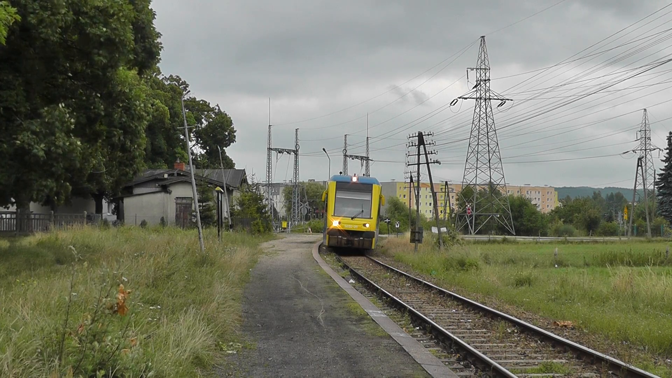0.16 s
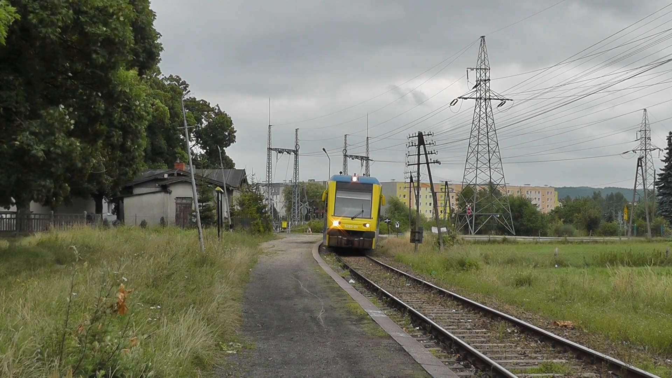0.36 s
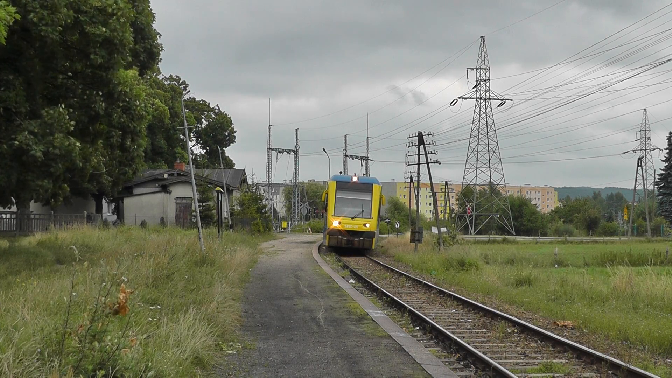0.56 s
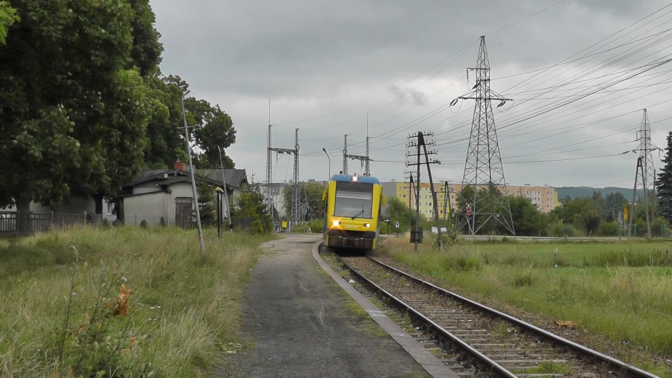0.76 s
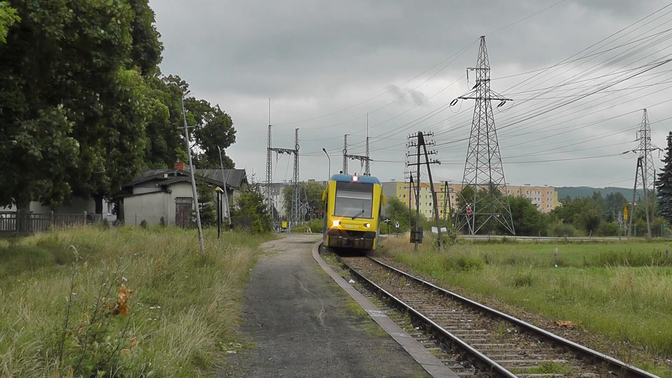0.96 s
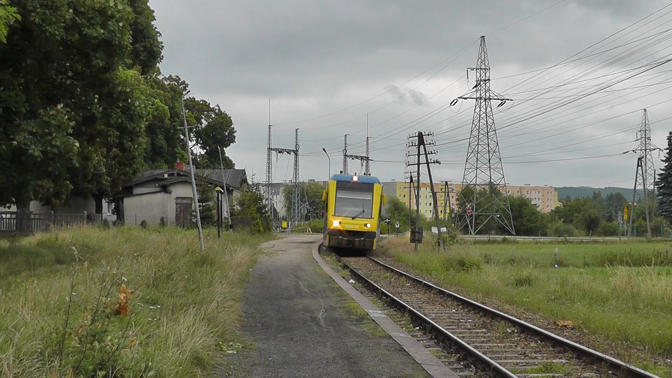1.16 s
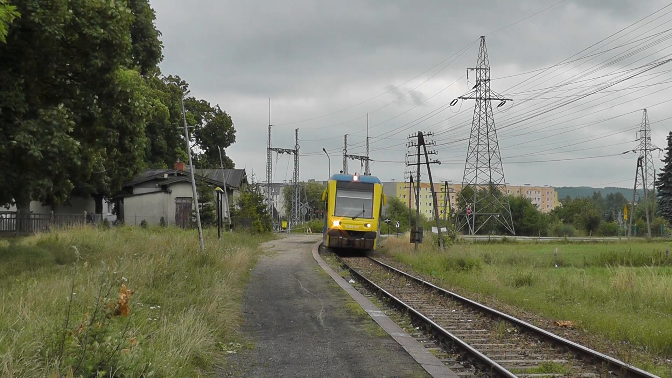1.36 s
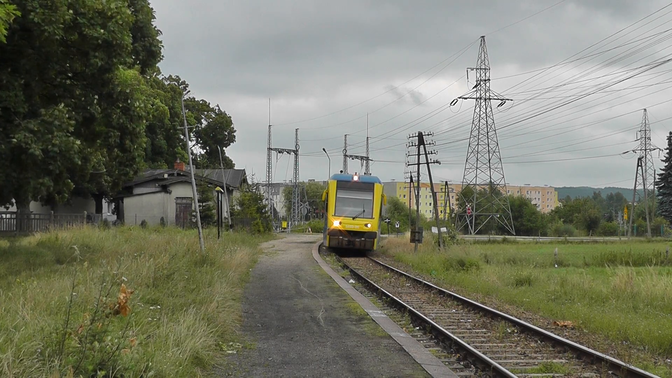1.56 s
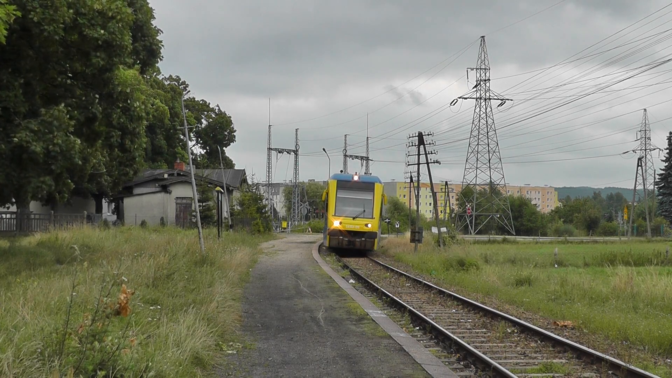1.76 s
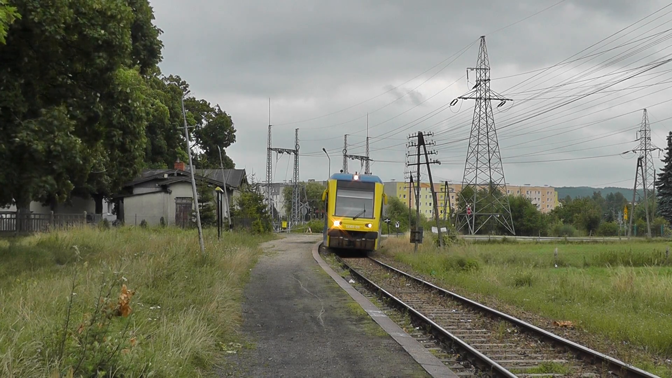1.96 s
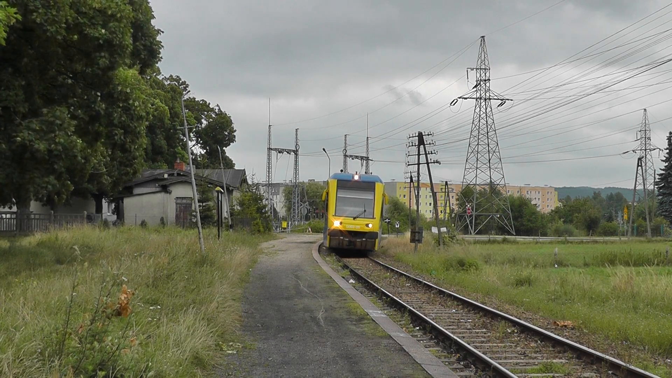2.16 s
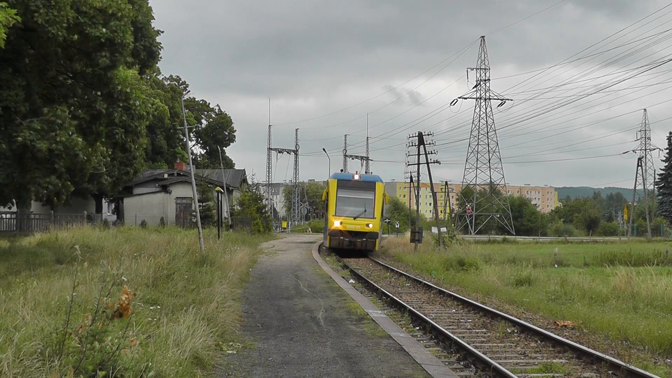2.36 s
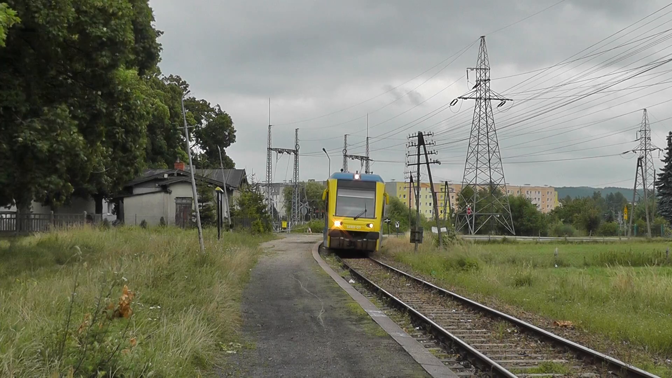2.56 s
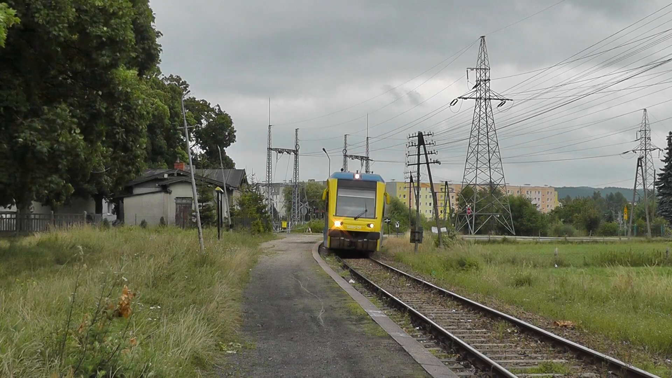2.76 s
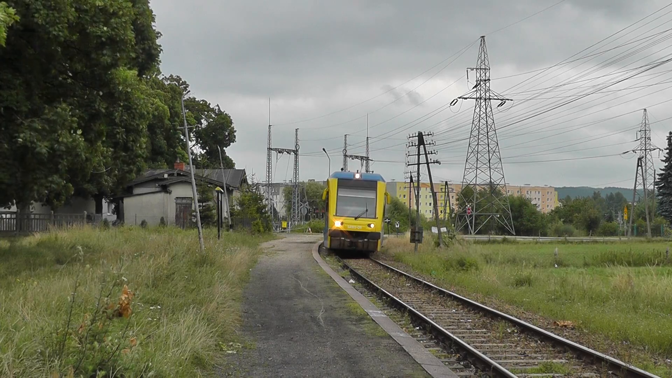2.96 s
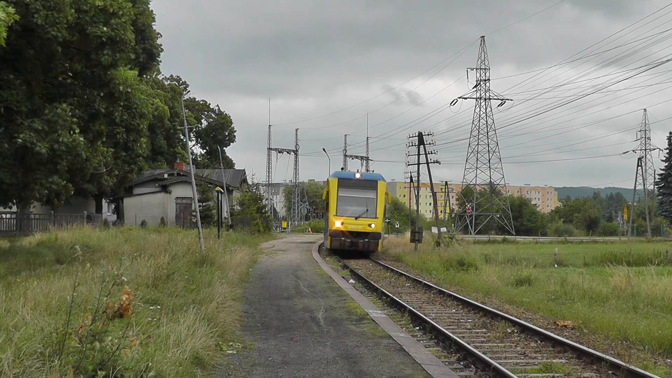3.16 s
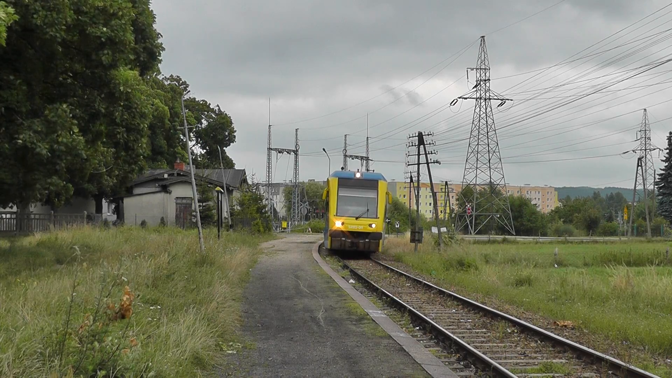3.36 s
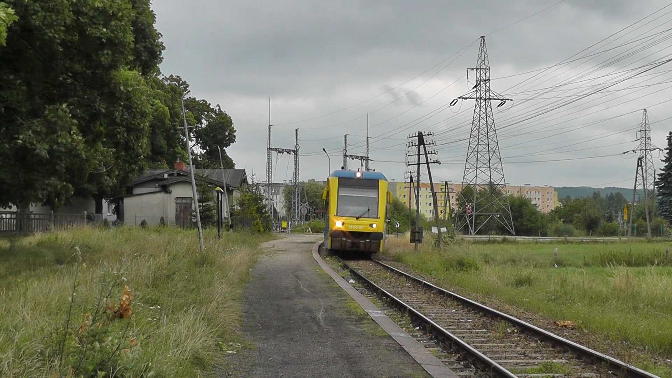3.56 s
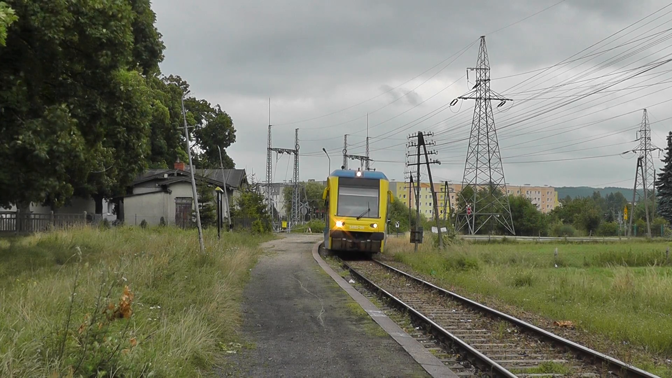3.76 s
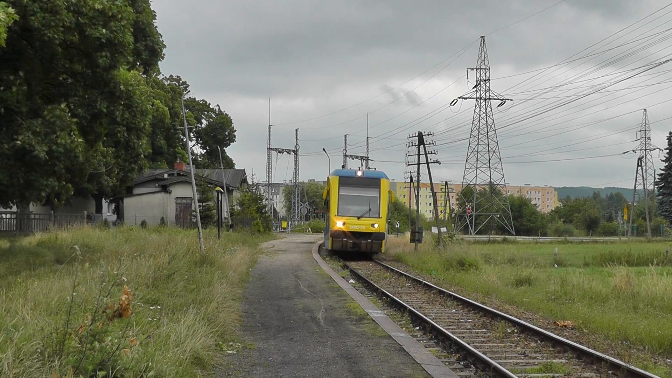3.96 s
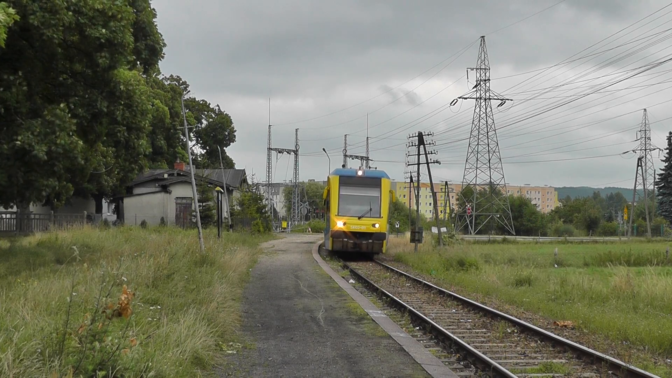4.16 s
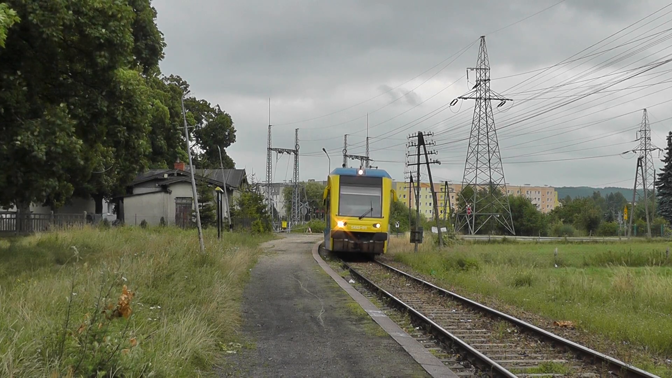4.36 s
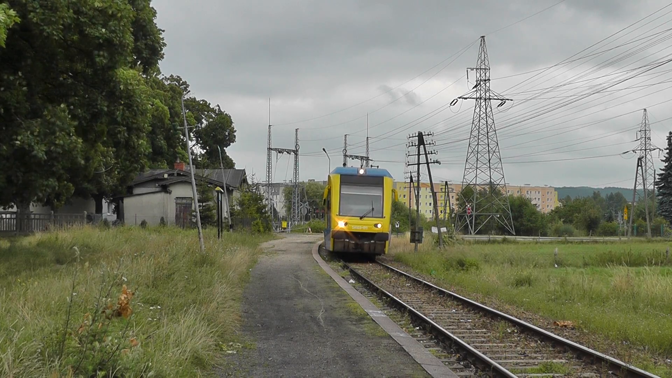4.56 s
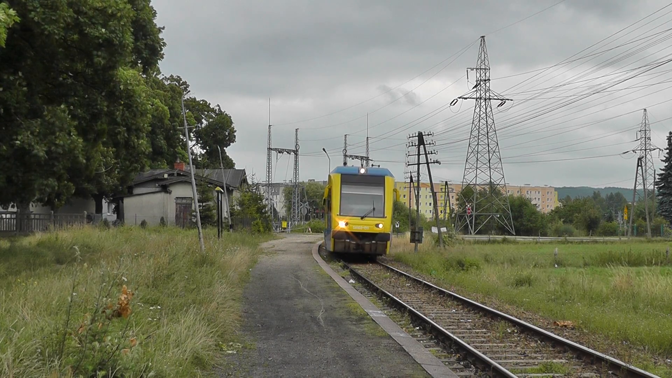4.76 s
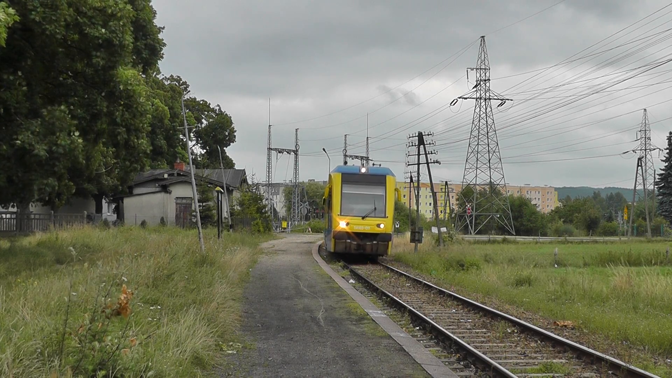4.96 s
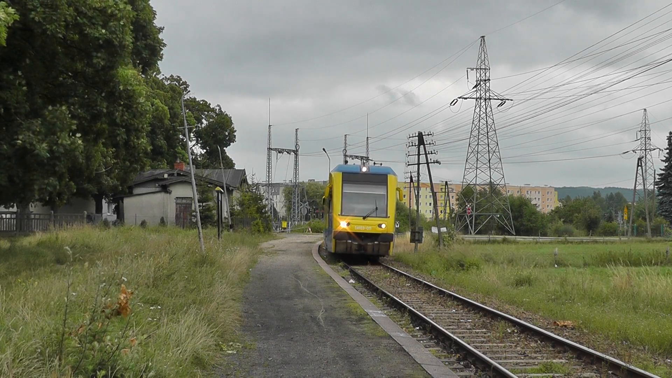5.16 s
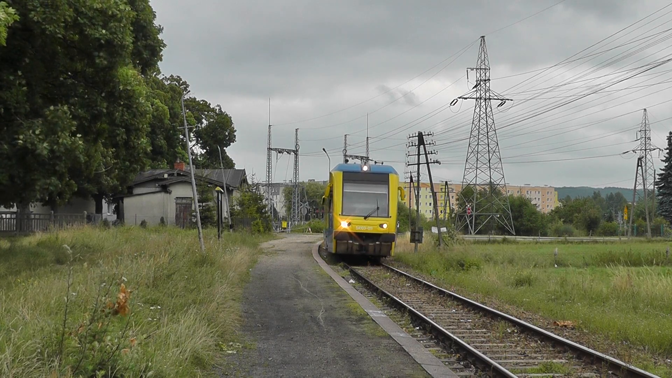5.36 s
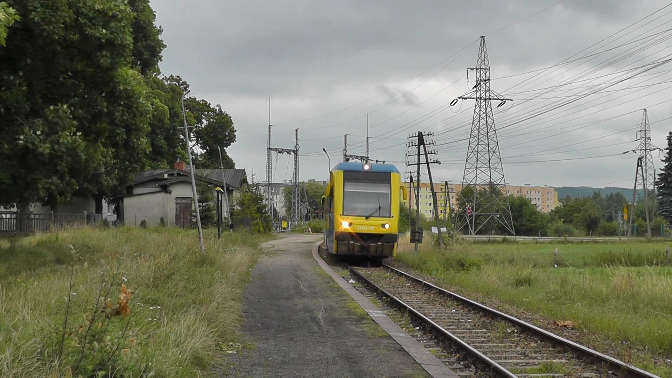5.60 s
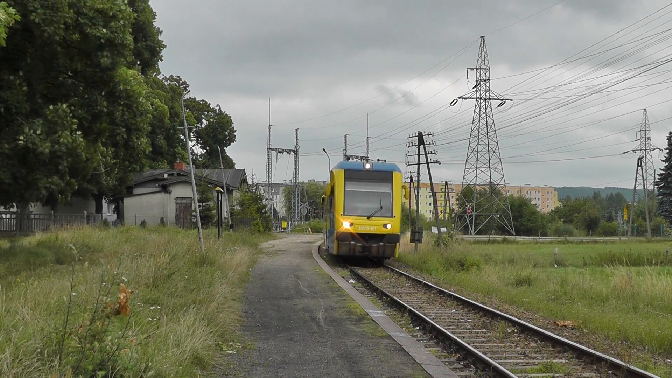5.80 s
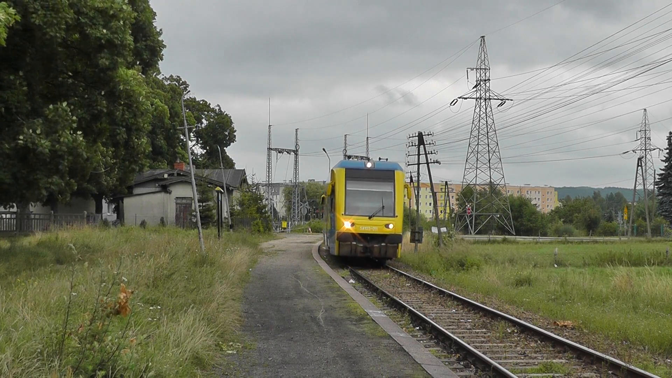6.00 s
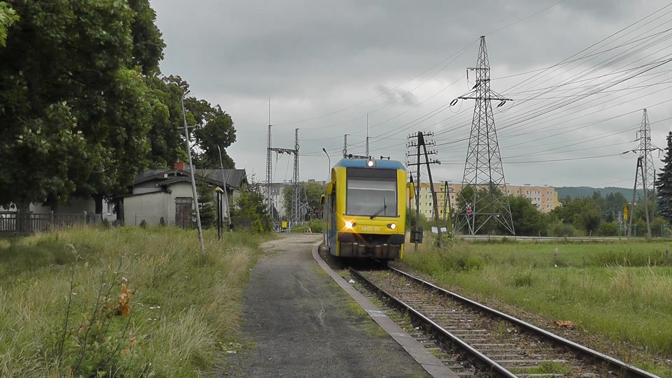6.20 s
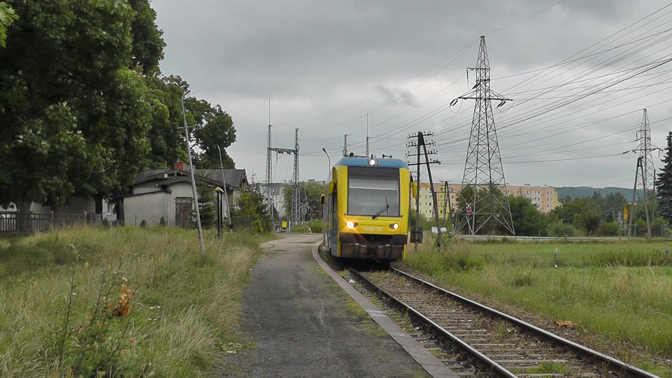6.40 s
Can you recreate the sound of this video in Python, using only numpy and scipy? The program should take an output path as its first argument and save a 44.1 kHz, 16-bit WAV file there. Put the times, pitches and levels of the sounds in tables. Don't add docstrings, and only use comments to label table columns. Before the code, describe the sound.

A stationary stereo microphone by the line hears a railcar pulling nearer under light breeze. First the engine is modest, with an echoing jackdaw call, hoarse sparrow chirps and faint magpie rasps. A short air-valve spit follows, then a thin turbo whistle rises near three seconds. The drone, mechanical clatter and cooling-air hiss swell continuously, loudest at the end, without the train passing.

```python
import sys
import numpy as np
from scipy import signal
from scipy.fft import rfft, irfft, next_fast_len
from scipy.io import wavfile
from scipy.ndimage import uniform_filter1d, map_coordinates

SR = 44100
rng = np.random.default_rng(int(sys.argv[2]) if len(sys.argv) > 2 else 0)


def volts_from_decibels(level):
    exponent = np.asarray(level, float) / 20
    return 10 ** exponent


def log_audio(samples):
    frames = np.atleast_2d(samples).T
    limited = np.clip(frames, -1, 1)
    pcm = np.round(limited * 32767).astype(np.int16)
    wavfile.write(sys.argv[1], SR, pcm)


N = 283563
TIME = np.arange(N) / SR

# time_s, engine_load_db, air_flow_db
LOAD = [(0, 0, 0), (.6, -1.5, -1.5), (1.4, .5, 0.5), (2, 2, 4), (2.65, 3, 7.5), (2.92, 4, 9),
        (3.35, 6.5, 8.5), (3.6, 7, 10), (3.85, 10.5, 11.5), (4.1, 11.5, 16.5), (4.35, 12, 18),
        (4.95, 14, 18), (5.25, 16, 19), (5.8, 16.5, 18.5), (6.43, 18.5, 21.5)]


def unit(x):
    return x / np.sqrt(np.mean(np.abs(x) ** 2) + 1e-20)


def along(points, hz, axis=1):
    table = np.transpose(points)
    return np.interp(np.log(hz + 1), np.log(table[0] + 1), table[axis])


def curves(rows):
    s, *columns = np.transpose(rows)
    return [np.interp(TIME, s, column) for column in columns]


def wobble(rate):
    return map_coordinates(rng.standard_normal(int(N * rate / SR) + 4), [TIME * rate])


def swell(s, hold, rise, fall, db):
    early = (s - TIME) * rise
    late = (TIME - s - hold) * fall
    return db - np.maximum(0, np.maximum(early, late))


def law(control_db, rest_db, slope):
    return rest_db + slope * control_db


def filtered(x, response):
    m = next_fast_len(N + 8192)
    return irfft(rfft(x, m) * response(np.fft.rfftfreq(m, 1 / SR)), m)[..., :N]


def shade(points):
    return lambda hz: volts_from_decibels(along(points, hz))


def modes(table):
    def response(f):
        total = 0
        for k, (c, w, db) in enumerate(table):
            total = total + (-1) ** k * volts_from_decibels(db) * 1j * f * w / (c * c - f * f + 1j * f * w)
        return total
    return response


def turns(hz):
    return 2 * np.pi * np.cumsum(hz) / SR


def rush(colour, patchy_db):
    z = signal.stft(rng.standard_normal((2, N)), nperseg=512)[2]
    patches = uniform_filter1d(rng.standard_normal(z.shape[1:]), size=7, axis=0)
    patches = uniform_filter1d(patches, size=14, axis=1)
    pair = signal.istft(z * volts_from_decibels(patchy_db * unit(patches)), nperseg=512)[1][:, :N]
    return unit(filtered(pair, colour))


def whistle(hz, width_hz):
    fuzz = lambda: wobble(width_hz) + 1j * wobble(width_hz)
    return unit(np.real(np.array([fuzz(), fuzz()]) * np.exp(1j * turns(hz))))


def scattered(x, wet_db, t60):
    t = TIME[:SR // 2]
    tail = rng.standard_normal((2, len(t))) * volts_from_decibels(-60 * t / t60)
    return volts_from_decibels(wet_db) * signal.fftconvolve(x[None], tail / np.linalg.norm(tail[0]), axes=1)[:, :N]


def engine():
    # time_s, rate_hz
    speed = [(0.0, 56.5), (0.4, 58.93), (1.2, 64.4), (1.6, 67.8), (3.2, 79.9), (3.6, 82.45), (4.0, 83.2),
             (4.4, 84.8), (4.8, 85.1), (5.6, 86.11), (6.3, 86.54)]
    # time_s, blower_multiple of the firing rate
    slip = [(2, 2.72), (4, 2.667)]
    # time_s, level_db
    note = [(0, -35), (.75, -34), (1.2, -38), (1.6, -32.5), (2.1, -37.5), (2.62, -35), (3.1, -34),
            (3.5, -37.5), (3.85, -35.5), (4.05, -30), (4.55, -30.5), (4.85, -22), (5.2, -20), (6, -18),
            (6.2, -16), (6.43, -16.5)]
    # time_s, depth_db
    fades = [(.25, 2), (.95, 13), (2.41, 10), (2.77, 4), (3.29, 8), (3.52, 10), (3.84, 6), (4.319, 3)]
    # firing_multiple, level_db re exhaust rumble
    weak_orders = [(1.167, -39), (1.333, -34), (1.5, -16), (1.667, -28), (1.835, -32), (2.167, -27),
                   (2.333, -25), (4.667, -26.5), (5, -26.5)]
    # centre_hz, width_hz, level_db
    pipe = [(114.4, 1.1, -43), (127, 4, -41.5), (138.2, 4.6, -33), (143.3, 2.7, -29.5), (150.6, 1.7, -32),
            (160.6, 8.4, -41.5), (167.7, 2.6, -42), (173.7, 3.6, -44)]
    # centre_hz, width_hz, level_db
    stack = [(169, 4.8, -42), (186, 8.8, -55), (216, 6, -47), (242, 9, -52)]
    # centre_hz, width_hz, level_db
    housing = [(171.3, 8, -40.5), (186, 7.5, -47.5), (229.5, 5, -49.5)]
    # centre_hz, width_hz, level_db
    silencer = [(404, 20, 0), (650, 25, -5), (850, 50, -4)]
    # freq_hz, density_db per Hz
    rumble_colour = [(54, -25), (92, -7), (113, -4.5), (161, -7), (189, -7), (252, -10.5), (281, -15),
                     (372, -16), (403, -13.5), (454, -14.5), (563, -28), (620, -29), (810, -44),
                     (1360, -120)]
    # freq_hz, density_db per Hz
    roar_colour = [(310, -6.5), (520, -2.5), (602, -9), (657, -0.5), (1040, -7), (1370, -3.5), (1680, -4.5),
                   (1790, -3), (1900, -2.5), (2470, -11), (4180, -120)]
    # freq_hz, density_db per Hz
    clatter_colour = [(1030, -31), (1750, 0.5), (1820, -1.5), (2000, -4.5), (2300, -3.5), (2700, -1.5),
                      (3080, -2), (3390, -3.5), (3930, -5), (4580, -11), (5900, -18.5), (7670, -18),
                      (13000, -120)]

    firing_hz = curves(speed)[0]
    crank = turns(firing_hz)
    load_db = curves(LOAD)[0]
    fade_s = 0.043
    first_db = curves(note)[0] - sum(db * np.exp(-((TIME - s) / fade_s) ** 2) for s, db in fades)
    sheds_db = swell(1.25, hold=1.14, rise=1.8, fall=3.7, db=4.75)
    rumble_db = law(load_db, -42, 0.46) + np.maximum(0, sheds_db)
    roar_db = law(load_db, -46, 0.47)
    clatter_db = law(load_db, -51, 0.97)

    def tone(phase, db, rough):
        level = np.sqrt(2) * volts_from_decibels(db + rough * wobble(25))
        return level * np.sin(phase + 0.11 * rough * wobble(7.4))

    def piped(hz, duct, rest_db, slope, rough):
        return np.abs(modes(duct)(hz)) * tone(turns(hz), law(load_db, rest_db, slope), rough)

    tones = tone(crank, first_db, 0.36)
    tones = tones + piped(2 * firing_hz, pipe, 0.082, 0.17, rough=0.17)
    tones = tones + piped(5 / 2 * firing_hz, stack, -7, 0.81, rough=1.2)
    tones = tones + piped(3 * firing_hz, stack[2:], -4, 0.28, rough=1.2)
    blower_hz = firing_hz * curves(slip)[0]
    tones = tones + piped(blower_hz, housing, 0.1, 0.077, rough=2.0)
    for multiple, db in weak_orders:
        tones = tones + tone(multiple * crank, rumble_db + db + 5.3 * wobble(1.61), 1.2)

    throb = lambda depth: 1 + depth * np.cos(crank + 2.6 * wobble(6))
    gust = wobble(4.97)
    rumble = volts_from_decibels(rumble_db - 1.2) * throb(0.017) * rush(shade(rumble_colour), 0.79)
    roar = volts_from_decibels(roar_db + 0.33 * gust) * throb(0.04) * rush(shade(roar_colour), 0.44)
    clatter_level = volts_from_decibels(clatter_db + 0.42 * gust + 0.11 * wobble(15))
    clatter = clatter_level * throb(0.032) * rush(shade(clatter_colour), 0.71)
    box = volts_from_decibels(roar_db - 7) * rush(modes(silencer), .6)
    noise = rumble + roar + clatter + box

    drift_db = 0.22 * TIME
    lean = np.tanh(drift_db * np.log(10) / 40)
    diffuse_tones = .5 * filtered(tones, lambda f: 1j)
    return noise, np.array([tones, diffuse_tones]), tones * lean * [[1], [-1]]


def cooling():
    # freq_hz, density_db per Hz
    fan_colour = [(3240, -6), (5500, -23.5), (5770, -10.5), (6520, -0.5), (7590, 0.5), (10000, -5),
                  (13000, -34), (22000, -120)]
    # freq_hz, density_db per Hz
    intake_colour = [(5650, -12), (9600, -5.5), (10700, 0.5), (14500, -12.5), (15600, -17)]
    # peak_s, hold_s, rise_db_per_s, fall_db_per_s, level_db
    howls = [
        (6.16, .05, 10.4, 13, -37.5),
        (5.05, .5, 50, 8, -40.5),
    ]
    # centre_hz, width_hz, level_db
    ducts = [
        [(1415, 330, 0)],
        [(2760, 490, 0)],
    ]
    flow_db = curves(LOAD)[1]
    flutter_db = 0.14 * wobble(9.6) + 0.23 * wobble(9)
    boost_db = np.maximum(0, swell(2.43, hold=.7, rise=9, fall=8, db=3.7))
    fan = volts_from_decibels(law(flow_db, -61, 1) + flutter_db) * rush(shade(fan_colour), 0.39)
    intake = volts_from_decibels(law(flow_db, -68, 1.02) + boost_db + flutter_db) * rush(shade(intake_colour), .9)
    howl = sum(volts_from_decibels(swell(*row)) * rush(modes(duct), .6) for row, duct in zip(howls, ducts))
    return fan + intake + howl


def turbocharger():
    # peak_s, hold_s, rise_db_per_s, fall_db_per_s, level_db
    spool = [
        (2.8, 0.073, 23, 60, -55),
        (3.08, .1, 70, 43, -60),
        (4.3, .02, 12, 34, -69),
    ]
    start_hz, climb_hz_per_s = 10350, 1450
    blade_hz = np.clip(start_hz + climb_hz_per_s * (TIME - 2.5), start_hz, 14500)
    blade_level = sum(volts_from_decibels(swell(*row)) for row in spool)
    duct_level = volts_from_decibels(swell(2.76, hold=.1, rise=45, fall=110, db=-57))
    return blade_level * whistle(blade_hz, 1250) + duct_level * whistle(7550 + 0 * TIME, 330)


def valve():
    # centre_hz, width_hz, level_db
    nozzle_modes = [(7250, 420, 0), (8300, 500, -1), (9700, 900, -10), (11200, 500, -6), (13700, 400, -12)]
    # freq_hz, density_db per Hz
    puff_colour = [(3500, -40), (4500, -2), (7500, 2), (11300, 1), (12500, -14), (15500, -18), (16500, -60)]
    # peak_s, hold_s, rise_db_per_s, fall_db_per_s, level_db
    leaks = [
        (1.536, 0.012, 3000, 350, -49),
        (1.61, 0.086, 260, 300, -52.5),
    ]
    # start_s, hold_s, level_db
    puffs = [
        (1.542, .002, -51),
        (1.663, .006, -45.5),
        (2.407, .015, -54),
    ]
    leak = sum(volts_from_decibels(swell(*row)) for row in leaks)
    puff = sum(volts_from_decibels(swell(s, hold, 2500, 540, db)) for s, hold, db in puffs)
    nozzle = lambda f: modes(nozzle_modes)(f) ** 2 * (f > 6900)
    return leak * rush(nozzle, 0.95) + puff * rush(shade(puff_colour), 1.5)


def jackdaw():
    # time_s, pitch_hz
    glide = [(.075, 1450), (.1, 1395), (.113, 1270), (.128, 1090), (.136, 875), (.153, 715), (.168, 600),
             (.188, 520), (.225, 450)]
    # freq_hz, gain_db
    beak_colour = [(700, -28), (1400, -9), (1800, -7), (2200, -2), (2750, 0), (3200, -10), (4300, -18),
                   (5000, -28), (9000, -50)]
    # delay_s, colour_hz, level_db per pass
    walls = [(.045, 2600, -6), (.085, 2700, -5.5), (.125, 2700, -6), (.16, 2750, -5.5), (.208, 2080, -1.8)]
    effort_db = swell(.078, hold=.07, rise=8000, fall=170, db=-36.5)
    gape_db = swell(.14, hold=1, rise=420, fall=1, db=-25)
    pitch_hz = curves(glide)[0]
    phase = turns(pitch_hz * (1 + .004 * wobble(151)))
    beak = lambda f: shade(beak_colour)(f) + volts_from_decibels(gape_db) * np.exp(-((f - 5500) / 1700) ** 2)
    voice = 0
    for k in range(1, 15):
        rough = volts_from_decibels(1.5 * np.sqrt(k) * wobble(110))
        voice = voice + beak(k * pitch_hz) * rough * np.sin(k * phase)
    call = volts_from_decibels(effort_db) * (TIME < glide[-1][0]) * voice
    echo = 0
    for delay, colour_hz, level in walls:
        wall = modes([(colour_hz, 700, level)])
        echo = echo + filtered(np.roll(call, round(delay * SR)), lambda f: wall(f) ** 2)
    return call * volts_from_decibels([[3.5], [-7]]) + echo * volts_from_decibels([[-8], [3.5]]) + scattered(call, -6.5, .5)


def sparrows():
    # start_s, length_s, start_hz, end_hz, level_db
    chirps = [(.838, .026, 5000, 4400, -57), (.853, .036, 4250, 4100, -53), (.884, .018, 3500, 3450, -53),
              (.898, .024, 3500, 4200, -55), (1.8, .022, 3700, 4500, -56), (1.826, .022, 3300, 4600, -53),
              (1.838, .018, 4600, 4500, -52), (1.842, .035, 3800, 3400, -52)]
    song = np.zeros(N)
    warble_hz = 220 * np.sin(2 * np.pi * 90 * TIME)
    for s, length, start_hz, end_hz, db in chirps:
        u = np.clip((TIME - s) / length, 0, 1)
        hoarse = 1 + .35 * wobble(300)
        sweep = np.sin(turns(start_hz + (end_hz - start_hz) * u + warble_hz))
        song += np.sqrt(2) * volts_from_decibels(db + 2.0) * np.sin(np.pi * u) * hoarse * sweep
    return song * volts_from_decibels([[1.5], [-1.5]]) + scattered(song, -5, .25)


def magpie():
    # centre_s, level_db
    chatter = [(1.43, -44.5), (1.63, -46), (1.75, -44), (1.92, -42.5), (2.05, -48), (2.226, -41),
               (2.34, -39)]
    # centre_hz, width_hz, level_db
    bill = [(1420, 700, 4), (2060, 530, 10), (2840, 370, -3)]
    throat_turns = turns(300 + 25 * wobble(40)) / (2 * np.pi)
    beats = np.diff(np.floor(throat_turns), prepend=0)
    throat = unit(filtered(beats * volts_from_decibels(2.5 * wobble(200)), modes(bill)))
    breath = .5 * rush(modes(bill), .4)[0]
    strokes = sum(volts_from_decibels(db) * np.exp(-((TIME - s) / 0.031) ** 2) for s, db in chatter)
    rasps = unit(throat + breath) * strokes
    return rasps * volts_from_decibels([[3], [-5]]) + scattered(rasps, -6, .25)


def breeze():
    # peak_s, level_db
    gusts = [(0, -50), (.19, -52), (1.05, -50), (1.36, -53), (2.15, -51), (2.6, -60), (4.55, -57),
             (5.51, -54), (5.89, -59), (6.43, -51)]
    # freq_hz, density_db per Hz
    buffet_colour = [(22, -47), (30, -25), (42, -19), (55, 4), (95, -14), (110, -62)]
    calm_db = -61
    strength = volts_from_decibels(calm_db) + sum(volts_from_decibels(swell(s, 0, 70, 100, db)) for s, db in gusts)
    common, apart = strength * volts_from_decibels(2.8 * wobble(2.73)) * rush(shade(buffet_colour), 1.5)
    return np.array([common + .7 * apart, common - .7 * apart])


def town():
    # freq_hz, density_db per Hz
    floor_colour = [(300, -52), (600, -5), (860, -1.5), (1150, -1.5), (1500, -23), (4000, -20),
                    (6000, -22.5), (10000, -37), (15800, -31)]
    return volts_from_decibels(-49.5) * rush(shade(floor_colour), 0.15)


def capsule_hiss():
    # freq_hz, density_db per Hz
    hiss_colour = [(1500, -30), (4000, 3), (9000, -2), (15800, -12)]
    return volts_from_decibels(-68.5) * rush(shade(hiss_colour), .2)


def microphones(pair):
    # freq_hz, left_right_likeness, left_over_right_db, phase_lead_rad
    capsules = [(60, 0.91, 0.5, -0.35), (150, 0.62, -1, -0.13), (315, 0.62, -1.2, 0.34),
                (710, 0.81, 3.5, -0.39), (1250, 0.62, 1.5, 0.19), (2230, 0.66, 3, -0.27),
                (3500, 0.86, 2.5, 0.056), (5000, 0.87, 1, 0.12), (7500, 0.84, -0.5, 0.051),
                (9000, 0.7, 2, 0.36), (9550, .1, 3.5, 0.69), (11400, 0.63, -0.5, -.6),
                (13500, 0.53, -4, -.4), (16000, .4, 1, -.2)]
    turn = lambda hz: np.arccos(np.clip(along(capsules, hz), 0, 1)) / 2
    mid, side = filtered(pair, lambda hz: np.array([np.cos(turn(hz)), np.sin(turn(hz))]))

    def tilt(hz):
        return volts_from_decibels(along(capsules, hz, axis=2) / 2) * np.exp(.5j * along(capsules, hz, axis=3))

    return filtered(np.array([mid + side, mid - side]), lambda hz: np.array([tilt(hz), 1 / tilt(hz)]))


def scene():
    noise, tones, lean = engine()
    railcar = noise + tones + cooling() + turbocharger() + valve()
    birds = jackdaw() + sparrows() + magpie()
    return microphones(railcar + town()) + lean + birds + breeze() + capsule_hiss()


def band_limit(x):
    return signal.sosfilt(signal.butter(12, 15760, fs=SR, output="sos"), x)


def record(dry):
    # centre_hz, width_hz, depth_db
    cavities = [(1800, 280, 9.5), (2364, 190, 5.5), (3056, 210, 7.5)]
    dip = lambda f, c, w, db: 1 - (1 - volts_from_decibels(-db)) * 1j * f * w / (c * c - f * f + 1j * f * w)
    wet = filtered(dry, lambda f: np.prod([dip(f, *cavity) for cavity in cavities], axis=0))
    return band_limit(wet)


dry = scene()
out = record(dry)
log_audio(out)
```